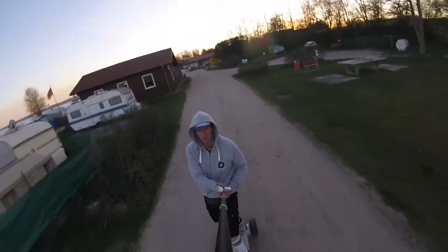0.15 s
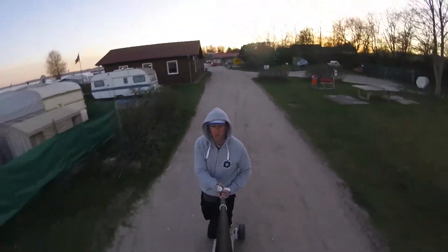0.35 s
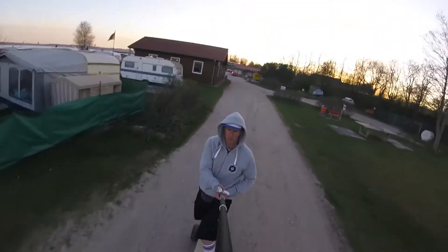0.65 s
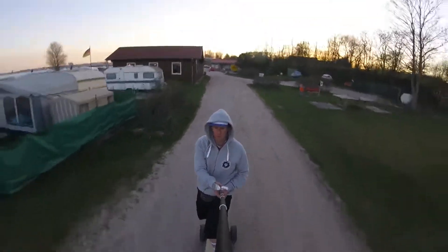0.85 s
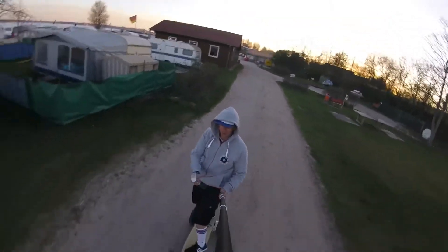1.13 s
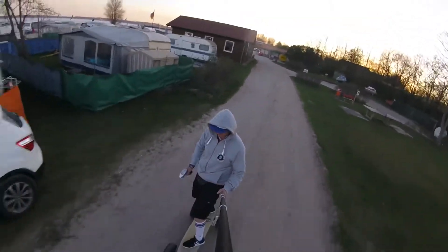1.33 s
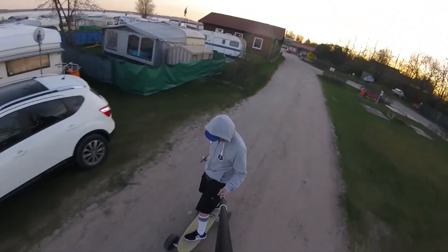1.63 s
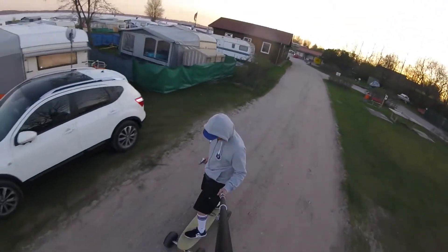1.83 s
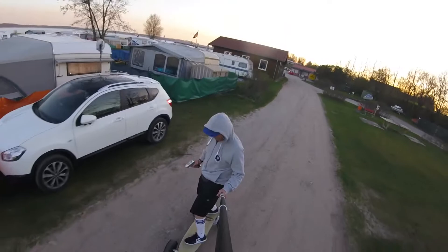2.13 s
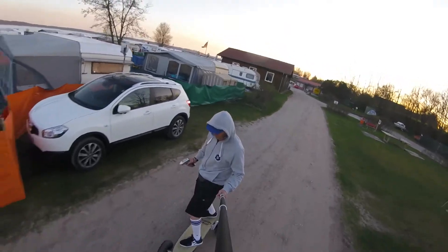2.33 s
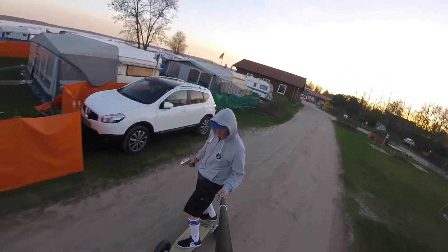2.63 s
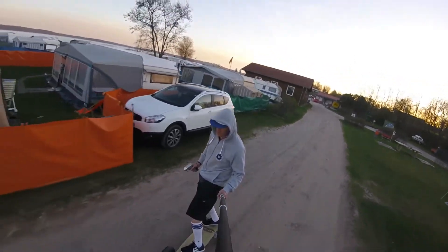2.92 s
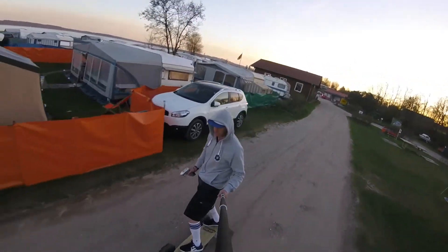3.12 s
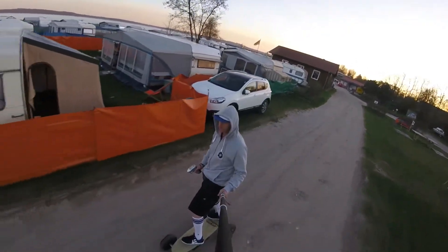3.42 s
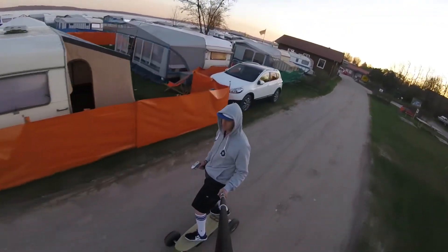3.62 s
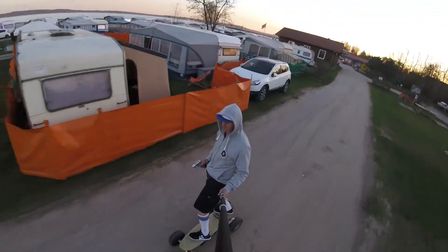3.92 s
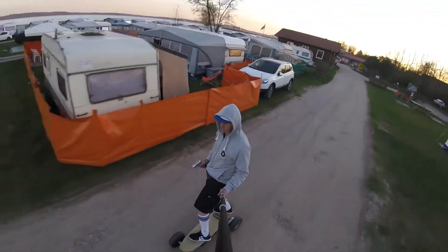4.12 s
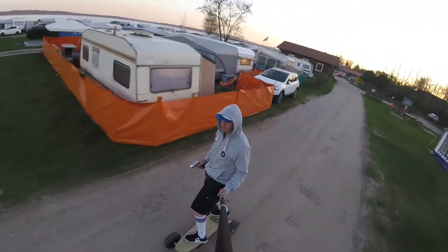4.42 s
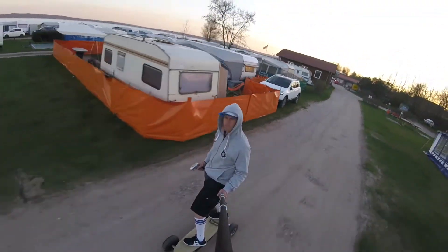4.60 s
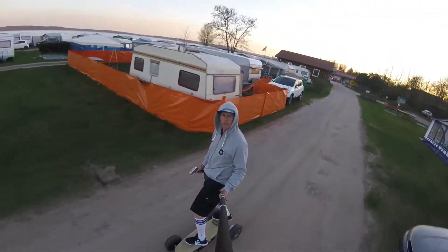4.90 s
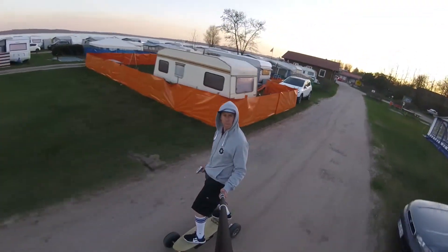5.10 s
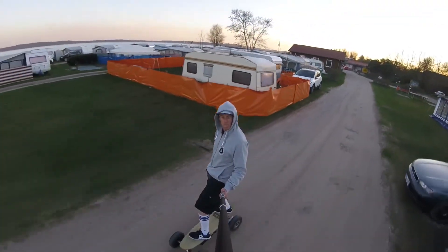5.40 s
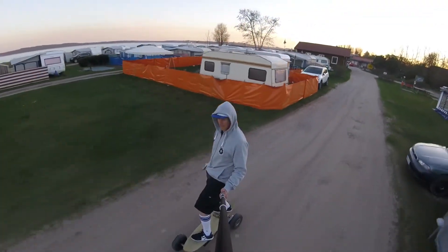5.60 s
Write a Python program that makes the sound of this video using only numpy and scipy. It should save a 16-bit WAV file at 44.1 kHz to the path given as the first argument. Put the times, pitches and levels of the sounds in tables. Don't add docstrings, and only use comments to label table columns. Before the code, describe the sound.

An electric board rides along a loose gravel path outdoors, heard by a camera on a pole about a metre from the wheels. From the start, tyres crush grit in an uneven, grainy crunch with hissing sand, while pebbles knock, tick and ring briefly. Low wind rumble flutters and pops against the microphone, especially in the first second. A faint motor whine is steady at first, fades almost away by 2.5 s, then returns around 2.9 s and climbs slowly to the end. Dull stone hits land near 2.1 and 3.2 s, with bright cracks near 2.9 and 3.4 s. Wind is calmer from about 2.5 to 3.6 s, then gusts and thumps build again, strong around 4.5 and 5.55 s. Stones clatter densely from 4.2 to 4.8 s, with a hard knock at 5.3 s. The crunch is heavier near 5 s and continues to the end.

```python
import sys
import numpy as np
from scipy import signal
from scipy.fft import rfft, irfft
from scipy.io import wavfile
from scipy.ndimage import uniform_filter1d

SR = 44100
rng = np.random.default_rng(int(sys.argv[2]) if len(sys.argv) > 2 else 0)


def to_linear_factor(level_db):
    exponent = np.asarray(level_db, float) / 20
    return 10 ** exponent


def to_wav(sig):
    pcm = np.clip(np.atleast_2d(sig), -1, 1) * 32767
    pcm = np.round(pcm).astype(np.int16)
    wavfile.write(sys.argv[1], SR, pcm.T)


N = 253575
TIME = np.arange(N) / SR

# t/s, f/Hz, level/dB
MOTOR_WHINE = [
    (0, 315.6, -53.5),
    (2.5, 300, -74),
    (2.9, 328, -54.5),
    (3.2, 348.4, -51),
    (3.7, 370.4, -50),
    (4.3, 393.2, -49.5),
    (4.9, 420, -53),
    (5.3, 428.2, -49.5),
    (5.75, 440.7, -51),
]
# multiple of its pitch, level/dB
WHINE_OVERTONES = [(1, 0), (3, -7)]
# t/s, level/dB
AIR_STREAM = [(0.0, -32), (0.52, -28), (1.05, -31), (1.57, -35), (2.09, -31), (2.61, -42), (3.14, -38.5),
              (3.66, -33.5), (4.18, -30), (4.7, -28.5), (5.23, -31), (5.75, -26)]
# f/Hz, level/dB per Hz
RUMBLE_COLOUR = [(15, -57), (25, -10.5), (40, 1.5), (60, -2.5), (90, -2.5), (140, -18.5)]
# f/Hz, level/dB per Hz
FLUTTER_COLOUR = [(70, 0), (110, 3), (160, -5.5), (250, -15.5), (400, -24), (700, -47)]
# t/s, half length/ms, level/dB
RUMBLE_GUSTS = [(0.215, 14, -10), (0.339, 14, 14.5), (0.414, 23, -2), (0.768, 20, -23), (0.838, 30.0, -1.5),
                (0.943, 47, 6.5), (1.227, 33, 4.5), (1.347, 26, 2), (1.616, 27, 10.5), (1.731, 75, -2),
                (1.911, 86, 0.5), (2.12, 21, 4), (2.375, 110, 1.5), (2.539, 33, -5), (2.684, 40, 6),
                (2.908, 30.0, 5.0), (3.103, 65, -5), (3.307, 69, -9), (3.412, 24, -9), (3.557, 31, -13),
                (3.687, 45.0, 2.5), (3.851, 20, -5), (3.971, 45.0, 5), (4.38, 26.5, 1), (4.51, 14, 12),
                (4.62, 47, -5), (5.123, 30.0, 6), (5.358, 52, -4), (5.627, 17, 3), (5.697, 50, -2)]
# t/s, half length/ms, level/dB
PORT_EDDIES = [(0.339, 12, 6), (0.409, 30.0, -4), (0.494, 34, 14), (0.554, 22, -9), (0.708, 36, 6),
               (0.853, 37, -12), (0.913, 14, 0), (1.217, 51, -2.5), (1.422, 40, -6), (1.527, 17, -1),
               (1.631, 21, 10), (1.771, 88, -4.5), (1.846, 15, 12), (2.17, 25, -2.5), (2.29, 88, -3.5),
               (2.519, 280, -2), (2.893, 82, 6), (3.013, 22, 4.5), (3.138, 69, 4.5), (3.382, 32, -11),
               (3.592, 130, 2), (4.021, 31, -8), (4.245, 18, -17), (4.425, 63, 6), (4.565, 22, -4),
               (5.068, 21, -14), (5.193, 120, 1), (5.343, 88, -1.5), (5.562, 77, 1), (5.672, 30, -5)]
# t/s, depth/dB, length/ms
SUCTION_BUFFETS = [(0.16, -20, 9.3), (0.329, -13, 5.6), (0.352, -21.5, 14), (0.477, -14, 11.5),
                   (0.498, -16.5, 4.2), (0.507, -13.0, 6.5), (0.53, -16, 11.5), (0.575, -11.5, 7.3),
                   (0.644, -10, 4.6), (0.665, -12.0, 6), (0.718, -12, 4.8), (0.765, -7, 6.9),
                   (0.894, -16.5, 5.6), (0.903, -13, 6.8), (0.928, -16.5, 8.4), (0.966, -17, 12),
                   (1.061, -19, 6.2), (1.235, -17.5, 10), (1.334, -17.0, 4), (1.384, -17.5, 8.4),
                   (1.532, -13.5, 5.7), (1.6, -18, 4.6), (1.835, -16, 5.6), (1.855, -21, 6.4),
                   (1.96, -17, 8), (2.03, -17.5, 6.9), (2.136, -23, 8.7), (2.383, -23.5, 7.8),
                   (3.936, -22, 13), (3.996, -20, 6.6), (4.102, -14, 6.5), (4.154, -16.5, 4.3),
                   (4.166, -11.5, 5.2), (4.18, -21, 4.7), (4.196, -14, 3.4), (4.358, -11.0, 3.5),
                   (4.368, -14.5, 4), (4.389, -14.5, 5.5), (4.437, -19, 2.4), (4.451, -13.0, 5.8),
                   (4.489, -15.5, 3.9), (4.509, -16, 12.0), (4.532, -17.5, 10.6), (4.651, -18, 4.3),
                   (4.696, -15.5, 5.4), (4.744, -17, 8.5), (4.872, -19.0, 5.9), (4.991, -20, 6.9),
                   (5.111, -18, 7.4), (5.135, -18.0, 4.5), (5.184, -23, 4), (5.268, -16.5, 5.4),
                   (5.403, -17.5, 7.8), (5.461, -21, 9), (5.513, -11.5, 4.2), (5.563, -16.5, 3),
                   (5.62, -8, 4.6), (5.634, -11.0, 5.2), (5.706, -20, 6.9), (5.715, -12, 4.3)]
# t/s, peak level/dB, half length/ms
GUST_WHIPS = [(0.186, -37, 7.7), (0.323, -29, 7.9), (0.445, -27, 9.0), (0.57, -33, 9.0), (0.637, -28, 7.7),
              (0.712, -40, 9.0), (0.755, -38, 9.0), (1.117, -34, 10), (1.225, -36, 9.0), (1.409, -34, 7.7),
              (1.599, -38, 9.0), (1.829, -40, 9.8), (1.935, -26.5, 11), (2.359, -38, 9.0),
              (3.026, -37, 9.0), (3.155, -32, 7.4), (3.694, -28.5, 13), (4.103, -29.5, 8.1),
              (4.156, -24.5, 10), (4.284, -32, 10), (4.342, -36, 9.0), (4.361, -29, 6.9), (4.434, -27, 9.0),
              (4.52, -21, 9.0), (4.612, -30, 9.0), (4.693, -28, 8.8), (4.901, -29, 9.0), (4.991, -23.5, 10),
              (5.05, -28.5, 9.9), (5.136, -32, 9.0), (5.513, -27, 10), (5.555, -20.5, 8.5),
              (5.608, -24, 8.2), (5.693, -37, 7.3)]
# t/s, peak level/dB, ring f/Hz, ring length/cycles
STONE_KNOCKS = [(0.077, -24.5, 1080, 7.5), (0.099, -26, 1210, 5), (0.1615, -20, 2260, 7.3),
                (0.197, -22.5, 1740, 8.4), (0.2046, -26, 1200, 15), (0.411, -19, 1020, 23),
                (0.4173, -31, 990, 12), (0.424, -26, 2100, 7), (0.5545, -20, 2160, 3.3),
                (0.7618, -35, 730, 25), (0.776, -27, 5300, 10), (0.864, -20, 1750, 7.8),
                (0.8734, -21.5, 1750, 9), (0.957, -24.5, 1820, 24), (1.1349, -21, 1180, 4.9),
                (1.2706, -26, 2290, 10), (1.3165, -25, 2880, 7.8), (1.394, -25.5, 1790, 11),
                (1.822, -25, 2250, 12), (2.294, -27, 2600, 7), (2.3945, -18.5, 2200, 3.4),
                (2.5218, -19, 2340, 6), (2.7835, -22.5, 2640, 11), (2.8942, -14, 2040, 9),
                (3.097, -17, 1740, 2.5), (3.423, -15.5, 2870, 15), (3.4814, -27, 3180, 10),
                (4.287, -24, 5330, 14), (4.3035, -25, 2000, 9), (4.3095, -26, 1800, 8.7),
                (4.501, -20, 1500, 3.6), (4.6073, -24.5, 700, 17), (4.607, -27, 1050, 6),
                (4.7908, -23.5, 3060, 10.3), (4.9107, -14.5, 1900, 3.1), (5.325, -14, 1500, 4.8),
                (5.3255, -27, 1420, 8.5), (5.415, -17, 3000, 10), (5.436, -22, 1900, 8.4)]
# t/s, ring level/dB, ring f/Hz, crack level over ring/dB
STONE_SNAPS = [(0.3491, -20.5, 2550, -5), (0.478, -38, 2570, 6), (0.775, -22, 2600, -1.5),
               (0.988, -25.5, 1740, -4), (1.227, -22.5, 1600, -6), (1.346, -31, 1760, 7),
               (1.4307, -29, 1800, -12), (1.4572, -26, 1800, -7), (1.4834, -36, 2900, 6),
               (0.8755, -22, 1400, -12), (1.9186, -36, 2750, 6.5), (2.4884, -24, 1720, -1),
               (2.576, -32, 2660, 9), (2.6573, -29.5, 1320, 0), (2.697, -32, 2590, -7),
               (2.8227, -30, 2640, 5), (3.0279, -26, 1480, 0.5), (3.331, -32, 2520, 7),
               (3.3728, -27.5, 1880, 7), (3.676, -39, 1550, -11), (4.2852, -15, 2890, -4.5),
               (4.708, -21, 1750, -14), (4.7176, -16.5, 1920, -3.5), (4.9889, -22.5, 2100, -3),
               (5.066, -20.5, 2040, -4), (5.33, -36, 2500, 6), (5.525, -24, 3550, 0)]
# t/s, ring level/dB, ring f/Hz, crack level over ring/dB
STONE_THUDS = [
    (1.5533, -22, 1240, 0.5),
    (2.1212, -15, 1380, -19.5),
    (3.158, -15.5, 1640, -15),
]
# t/s, peak level/dB, ring f/Hz
GRAVEL_TICKS = [(0.0694, -31, 2730.0), (0.1543, -19, 2420), (0.195, -19, 2640.0), (0.2023, -24, 2890.0),
                (0.2166, -19, 2720.0), (0.3194, -27, 2740.0), (0.3261, -27, 4010.0), (0.415, -25, 1690.0),
                (0.5586, -22.0, 2370.0), (0.5787, -27, 2960.0), (0.7908, -27, 4830.0),
                (0.9487, -21.0, 3930.0), (1.079, -19.0, 3080), (1.182, -20, 2510.0), (1.2511, -33, 2640.0),
                (1.3177, -25, 2720.0), (1.3455, -29, 3630.0), (1.4546, -24, 3720.0), (1.4828, -29, 2730.0),
                (1.4849, -31, 4040.0), (1.5557, -20, 2460.0), (1.881, -24, 4030.0), (1.8903, -24.0, 3840.0),
                (1.9156, -28, 5390.0), (2.1056, -31, 4040.0), (2.119, -17, 2100.0), (2.1443, -24, 3850.0),
                (2.1982, -23, 2740.0), (2.391, -19, 3180.0), (2.5157, -19, 2290.0), (2.6592, -23.0, 2730.0),
                (2.6984, -30, 3450.0), (2.9724, -21, 4580.0), (3.1269, -22.0, 3170.0),
                (3.1281, -23, 3960.0), (3.3963, -19, 3040.0), (3.677, -24, 2080.0), (3.6978, -21, 3460.0),
                (3.901, -22, 2960.0), (3.9079, -18, 3170.0), (4.2305, -18.5, 3870.0), (4.3192, -18, 3560.0),
                (4.3866, -18, 4210.0), (4.4573, -19, 2880.0), (4.5146, -21, 3440), (4.6081, -20, 2200.0),
                (4.6572, -18, 2970.0), (4.6951, -21.0, 3240.0), (4.7063, -17.0, 3150.0),
                (4.7246, -17, 2540.0), (4.7517, -21.0, 2820.0), (5.2899, -22.0, 4890.0),
                (5.3218, -17, 1860), (5.332, -23, 2760.0), (5.5934, -17.5, 3790.0), (5.6569, -22.0, 2930.0),
                (5.6941, -19, 3690.0), (5.698, -16, 2800.0)]
# t/s, level/dB
TYRE_LOAD = [
    (0.0, -38),
    (0.82, -38.5),
    (1.64, -40),
    (2.46, -40),
    (3.29, -37),
    (4.11, -39),
    (4.93, -36),
    (5.75, -37),
]
# t/s, half length/ms, fine grit level/dB, coarse grit level/dB
GROUND_PATCHES = [(0.15, 65.0, 0, 0), (0.279, 19, -3, -3), (0.419, 25, 1.5, 1), (0.708, 44, -3, -3.5),
                  (0.778, 12, -2, 3), (0.828, 14, -8, -4), (0.868, 13, 0.5, 0), (1.217, 64, 0, 1.5),
                  (1.556, 19, 0, 2.5), (1.761, 98, -2.5, -2.5), (2.12, 5.9, 0, 11.5), (2.355, 13, -3, -5),
                  (2.579, 11, 7, 0.5), (2.893, 49, 5, 3), (2.968, 13, 4, 3.3), (3.083, 26, -4, -4.5),
                  (3.278, 61, -4, -3), (3.382, 33, 4.5, 3), (3.532, 145, -2, -2.5), (3.692, 24, 1, 5),
                  (3.801, 17.6, -7, -1.5), (3.911, 28, 3.5, 1.5), (4.041, 57, -1, 0.1), (4.29, 18, 3, 0.5),
                  (4.405, 69, 2.5, 3), (4.615, 9.9, 1, 3), (4.719, 41, 2.5, 1.5), (5.178, 240, -2, -3),
                  (5.328, 18, 5.5, 5.5), (5.428, 26, 4, 2.5)]
# f/Hz, level/dB per Hz
FINE_COLOUR = [(1500, -29), (2500, 1.5), (3500, 0), (5000, -4.5), (7000, -3.5), (8500, -4.5), (9500, -6),
               (14000, -44)]
# f/Hz, level/dB per Hz
COARSE_COLOUR = [(120, -15.5), (250, 3), (500, 2), (800, -3), (1300, 1), (1900, 4), (2900, 0), (4200, -11),
                 (6000, 0), (12000, -46.5)]
# f/Hz, width/Hz, boost/dB
HOUSING_RINGS = [(5180, 700, 9), (6140, 430, -10.5), (6444, 410, 9.5)]


def rms_one(x):
    return x / np.sqrt(np.mean(x ** 2) + 1e-20)


def white_noise():
    return rng.standard_normal(N)


def filtered(x, order, hz, kind="band"):
    return signal.sosfilt(signal.butter(order, hz, kind, fs=SR, output="sos"), x)


def in_time(rows):
    s, *columns = np.transpose(rows)
    return [np.interp(TIME, s, column) for column in columns]


def swells(rows):
    s, half_ms, *columns = np.transpose(rows)
    t = np.arange(0, N + 64, 64) / SR
    bells = np.exp(-((t[:, None] - s) * 1000 / half_ms) ** 2)
    return [np.interp(TIME, t, bells @ column) for column in columns]


def drift(rate_hz):
    r = np.exp(-2 * np.pi * rate_hz / SR)
    slow = signal.lfilter([1], [1, -2 * r, r * r], rng.standard_normal(N + SR))
    return rms_one(slow[SR:])


def resonance(x, hz, width_hz):
    r = np.exp(-np.pi * width_hz / SR)
    top = np.array([1, 0, -1]) * (1 - r * r) / 2
    return signal.lfilter(top, [1, -2 * r * np.cos(2 * np.pi * hz / SR), r * r], x)


def coloured(sources, colour, patchy_db, patch_rate):
    hz, level_db = np.transpose(colour)
    edges = hz[0] * 2 ** (np.arange(3 * np.log2(hz[-1] / hz[0]) + 1) / 3)
    out = 0
    for k, (low, high) in enumerate(zip(edges, edges[1:])):
        band = filtered(sources[k % len(sources)], 2, [low, high])
        band_db = np.interp(np.log(low * high) / 2, np.log(hz), level_db)
        out = out + to_linear_factor(band_db + patchy_db * drift(patch_rate)) * band
    return rms_one(out)


def tinted(x, colour):
    hz, level_db = np.transpose(colour)
    bins_hz = np.arange(1025) * SR / 2048 + 1
    log_gain = np.log(to_linear_factor(np.interp(np.log(bins_hz), np.log(hz), level_db)))
    cepstrum = irfft(log_gain) * np.r_[1, 2 * np.ones(1023), 1, np.zeros(1023)]
    response = irfft(np.exp(rfft(cepstrum)))
    return rms_one(signal.fftconvolve(x, response)[:N])


def evened(x, span_s):
    size = round(span_s * SR)
    power = uniform_filter1d(uniform_filter1d(x ** 2, size=size), size=size)
    return x / np.sqrt(power + 0.11)


def motors():
    hz, level_db = in_time(MOTOR_WHINE)
    phase = 2 * np.pi * np.cumsum(hz * (1 + .014 * drift(13.98))) / SR
    whine = 0
    for multiple, overtone_db in WHINE_OVERTONES:
        whine = whine + to_linear_factor(overtone_db + 2.2 * drift(25)) * np.sin(multiple * phase)
    switching_hz, switching_db = 7812.5, -66
    switching = to_linear_factor(switching_db) * np.sin(2 * np.pi * switching_hz * TIME)
    return np.sqrt(2) * (to_linear_factor(level_db) * whine + switching)


def whips():
    level_db, delay_s = -9, 0.0063
    puff = rms_one(filtered(white_noise(), 2, [200, 462]))
    rows = [(s + delay_s, half_ms, to_linear_factor(peak_db + level_db)) for s, peak_db, half_ms in GUST_WHIPS]
    strength, = swells(rows)
    return strength * evened(puff, .008)


def buffets():
    dips, air_gain = np.zeros(N), np.ones(N)
    for s, depth_db, length_ms in SUCTION_BUFFETS:
        near = slice(max(round((s - .04) * SR), 0), round((s + .04) * SR))
        u = (TIME[near] - s) * 1000 / (0.48 * length_ms)
        u = np.where(u < 0, u * 1.33, u / 1.4)
        dips[near] -= to_linear_factor(depth_db - 1.5) * (1 - u ** 2) * np.exp(-u ** 2 / 2)
        air_gain[near] *= 1 - .8 * np.exp(-(u / 1.19) ** 2)
    return dips, air_gain


def wind():
    sources = rng.standard_normal((2, N))
    rumble = evened(coloured(sources, RUMBLE_COLOUR, patchy_db=1.5, patch_rate=4.9), 0.069)
    flutter = evened(coloured(sources, FLUTTER_COLOUR, patchy_db=1.5, patch_rate=33.0), 0.021)

    stream_db, = in_time(AIR_STREAM)
    rumble_db = stream_db + 3.5 + swells(RUMBLE_GUSTS)[0]
    average_db = stream_db.mean()
    flutter_db = average_db + 0.92 * (stream_db - average_db) - 1.5
    flutter_db = flutter_db + swells(PORT_EDDIES)[0]

    edge_db = -16.5 + 0.25 * (flutter_db - flutter_db.mean())
    flutter = flutter + to_linear_factor(edge_db) * filtered(flutter, 2, 120, "high")

    air = to_linear_factor(rumble_db) * rumble + to_linear_factor(flutter_db) * flutter
    air = air - 1.2 * filtered(air ** 2, 1, 15, "high")
    dips, air_gain = buffets()
    return air_gain * air + dips + whips()


def all_stones():
    knocks = [(s, db, hz, cycles, -15, 0.054) for s, db, hz, cycles in STONE_KNOCKS]
    snaps = [(s, db, hz, 7.5, crack_db, 0.059) for s, db, hz, crack_db in STONE_SNAPS]
    thuds = [(s, db, hz, 3.4, crack_db, 0.11) for s, db, hz, crack_db in STONE_THUDS]
    ticks = [(s, db - 7.5, hz, 5.2, -3.5, 0.055) for s, db, hz in GRAVEL_TICKS]
    return knocks + snaps + thuds + ticks


def stones():
    length = 2048
    out, t = np.zeros(N + length), np.arange(length) / SR
    for s, peak_db, hz, cycles, crack_db, crack_ms in all_stones():
        chance = rng.random(2)
        fade = to_linear_factor(-60 * t * hz / (2.3 * cycles))
        onset = 1 - np.exp(-t * hz / (0.022 * cycles + 0.13))
        side_modes = 0
        for ratio in (.72, 1.12 + 0.037 * chance[0]):
            side_modes = side_modes + 0.5 * np.sin(2 * np.pi * hz * ratio * t)
        ring = (np.sin(2 * np.pi * hz * t) + side_modes * fade) * fade * onset
        phase = t * 1000 / crack_ms - 2.5
        crack = -2 * phase * np.exp(-phase ** 2)
        shot = to_linear_factor(peak_db - 0.96) * (ring + to_linear_factor(crack_db + 8.0) * crack)
        at = round(s * SR)
        echo = round((0.00043 + 0.0017 * chance[0]) * SR)
        out[at:at + length] += shot
        out[at + echo:at + length] -= (0.039 + 0.12 * chance[1]) * shot[:-echo]
    return out[:N]


def grit(per_s, spread_db, clumping_db, hiss, low_hz, high_hz, sharpness):
    sizes = to_linear_factor(spread_db * np.minimum(rng.exponential(1, N), 3.6)) * rng.choice([-1, 1], N)
    crushed = rng.random(N) < per_s * to_linear_factor(clumping_db) / SR
    grains = sizes * crushed + 1e-18
    pitch = rng.integers(0, 12, N)
    rings = 0
    for k, hz in enumerate(np.geomspace(low_hz, high_hz, 12)):
        rings = rings + resonance(grains * (pitch == k), hz, hz / sharpness)
    sand = filtered(white_noise(), 1, [low_hz, high_hz])
    return rms_one(rings) * to_linear_factor(clumping_db / 2) + hiss * rms_one(sand)


def tyres():
    load_db, = in_time(TYRE_LOAD)
    fine_patch_db, coarse_patch_db = swells(GROUND_PATCHES)
    fine_db = load_db + 2 + fine_patch_db
    coarse_db = load_db - 0.2 + coarse_patch_db

    clumps = 0.48 * drift(22) + .7 * drift(90)
    fine_clumps_db = 2.0 * clumps + 1.1 * drift(27)
    coarse_clumps_db = 2.0 * clumps + .6 * drift(30)
    fine = grit(4000, 2.9, fine_clumps_db, hiss=0.2, low_hz=2260, high_hz=10100, sharpness=2.5)
    coarse = grit(2200, 1.92, coarse_clumps_db, hiss=0.58, low_hz=273, high_hz=4720, sharpness=2.2)
    fine = to_linear_factor(fine_db - 6.5) * tinted(fine, FINE_COLOUR)
    coarse = to_linear_factor(coarse_db - 0.61) * tinted(coarse, COARSE_COLOUR)

    sand_db = -52
    sand = to_linear_factor(sand_db + 8.0) * filtered(white_noise(), 4, 7000, "high")
    return fine + coarse + sand


def scene():
    return (motors() + wind() + stones() + tyres())[None]


def housing(x):
    for hz, width_hz, boost_db in HOUSING_RINGS:
        x = x + (to_linear_factor(boost_db) - 1) * resonance(x, hz, width_hz)
    return x


def converter_hiss():
    level_db = -76 - 4 * (TIME < 0.77) + 2.4 * drift(6.6)
    return to_linear_factor(level_db) * rms_one(filtered(white_noise(), 4, [10900, 12900]))


def low_pass(x):
    return signal.sosfilt(signal.butter(12, 13200, fs=SR, output="sos"), x)


def record(dry):
    top_cut = signal.cheby2(12, 50, 10600, fs=SR, output="sos")
    cut = signal.sosfilt(top_cut, housing(dry))
    return low_pass(cut + converter_hiss())


dry = scene()
out = record(dry)
to_wav(out)
```